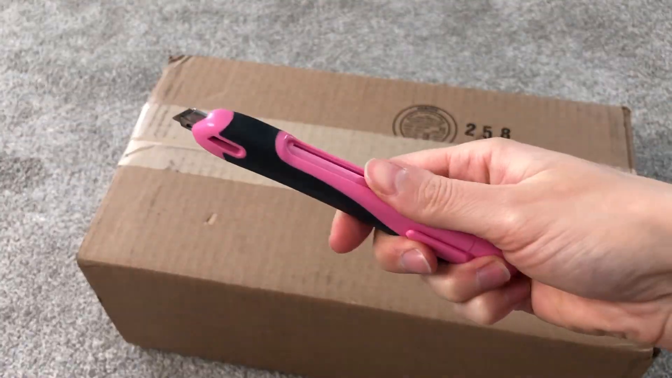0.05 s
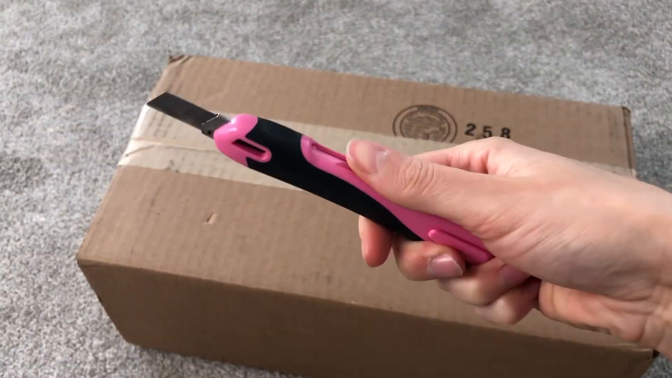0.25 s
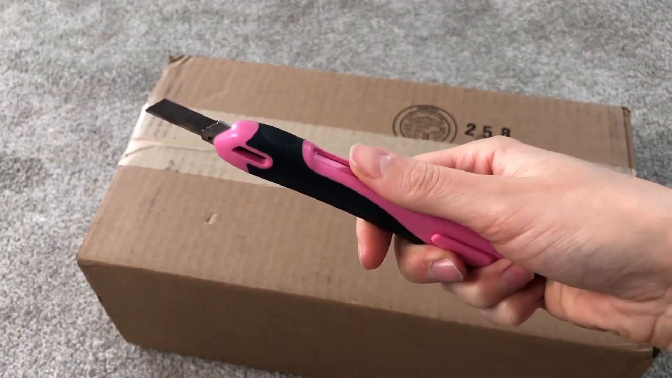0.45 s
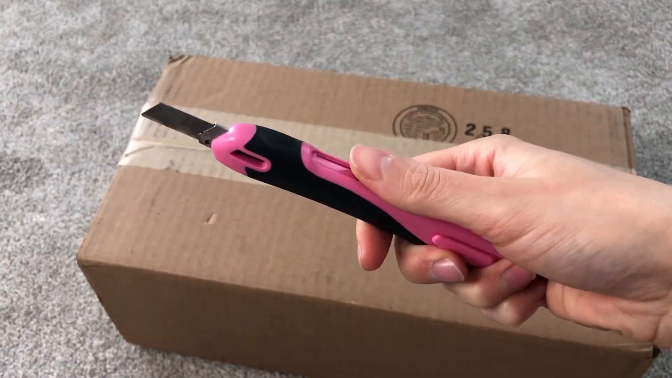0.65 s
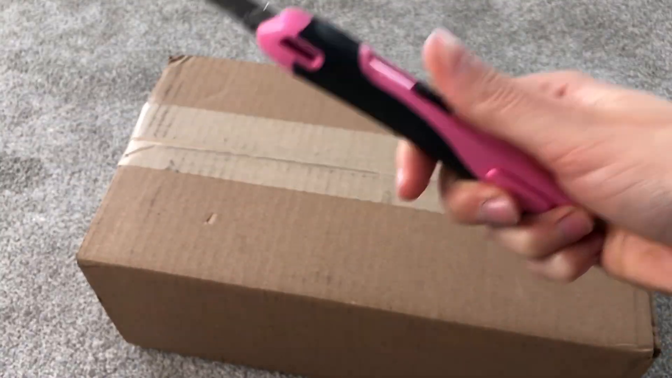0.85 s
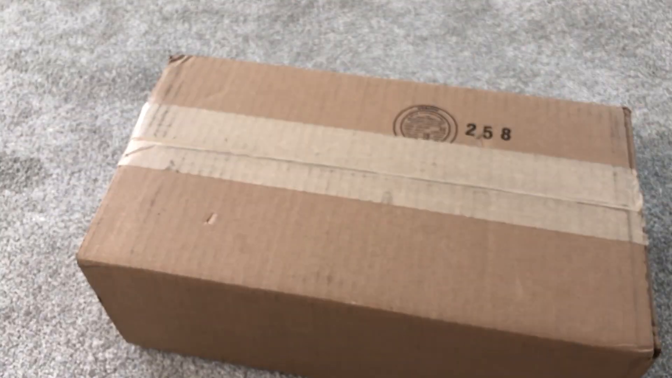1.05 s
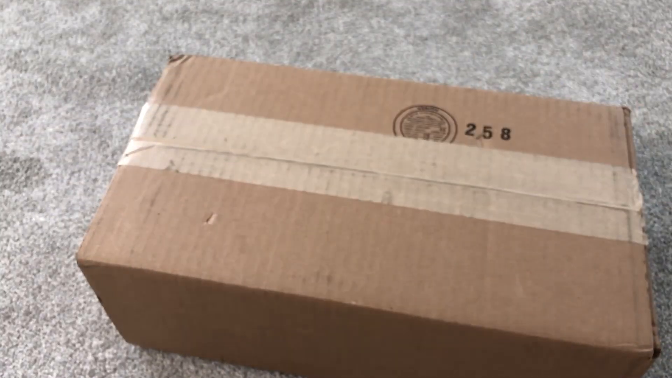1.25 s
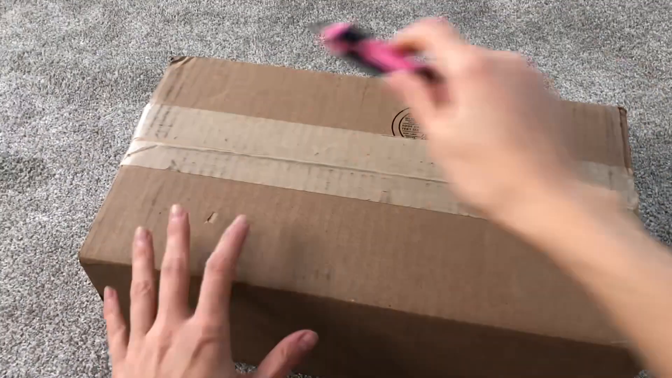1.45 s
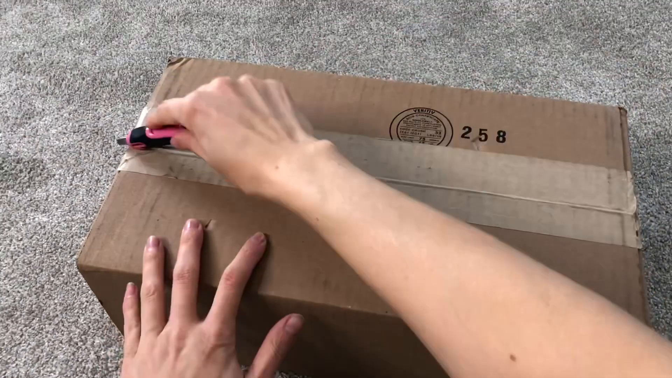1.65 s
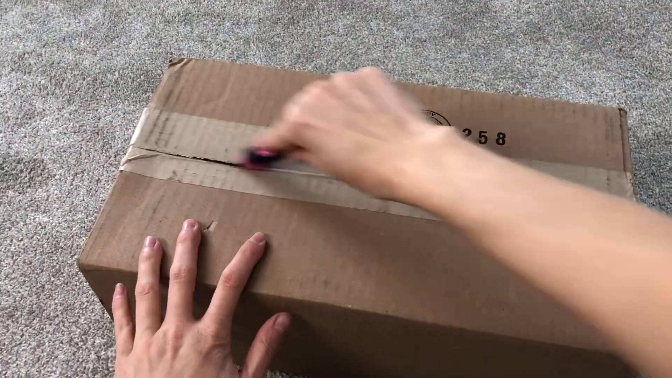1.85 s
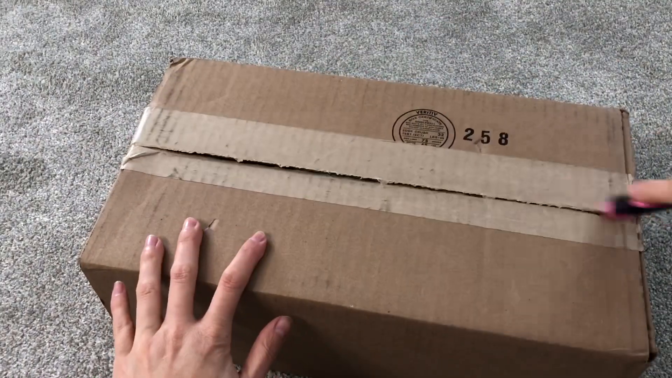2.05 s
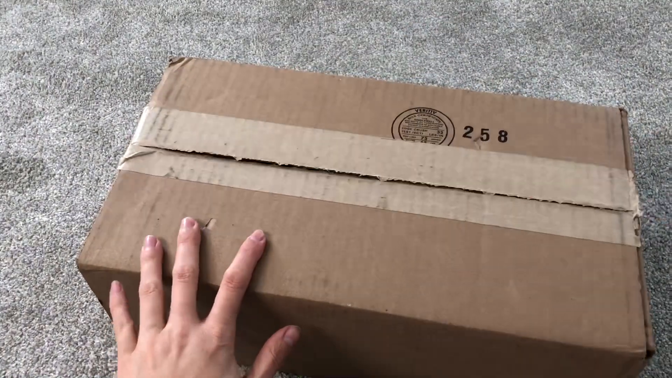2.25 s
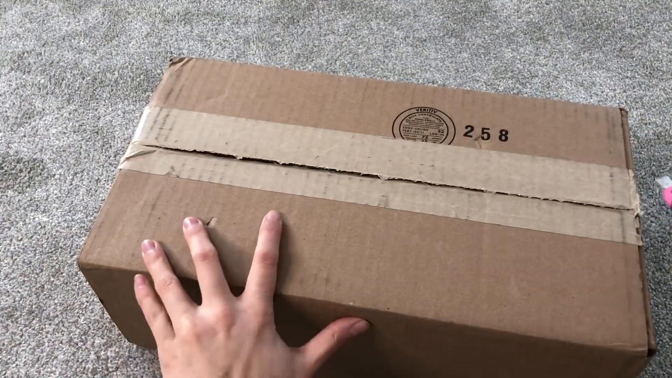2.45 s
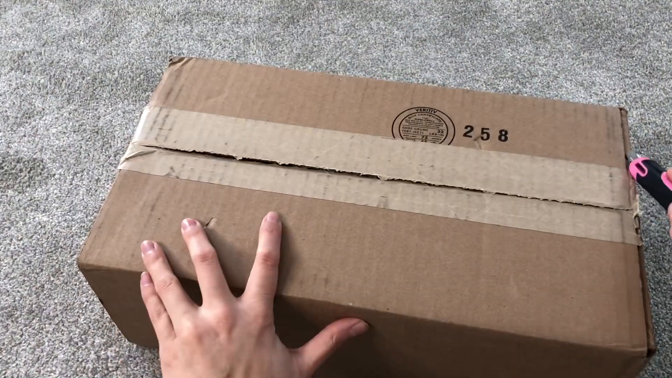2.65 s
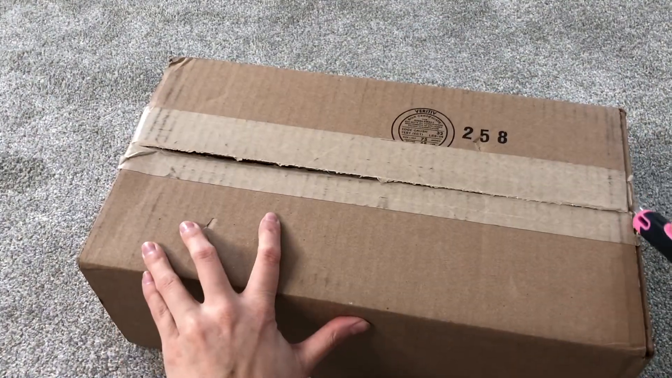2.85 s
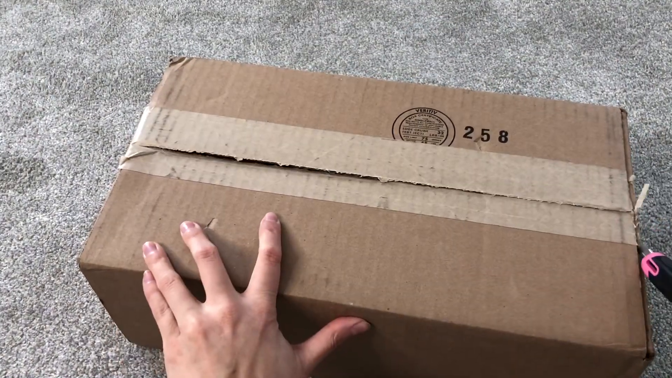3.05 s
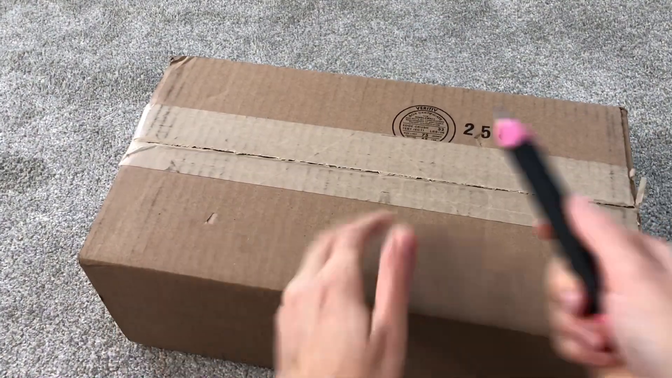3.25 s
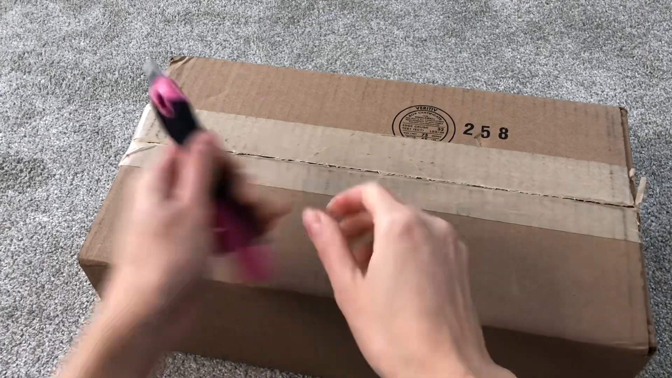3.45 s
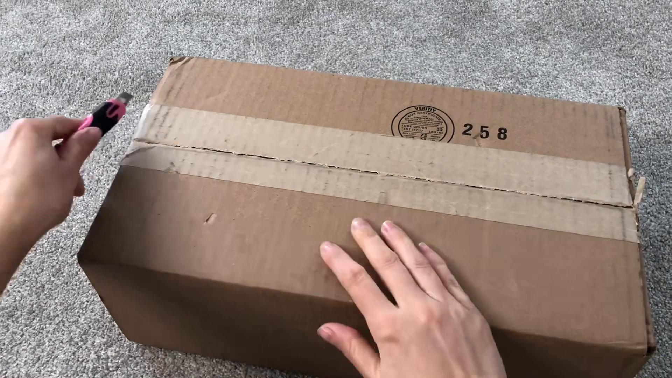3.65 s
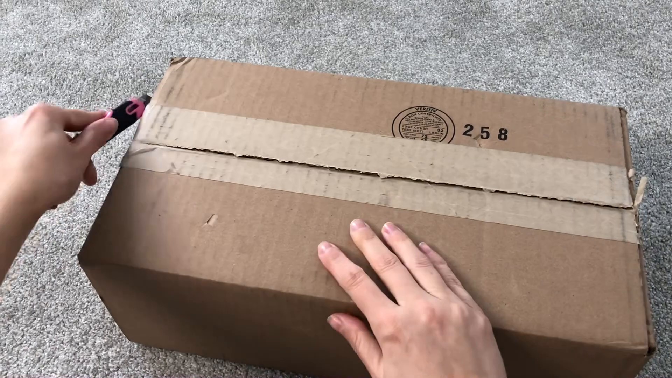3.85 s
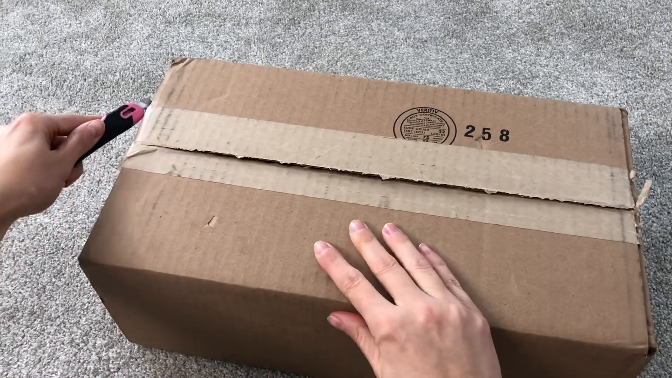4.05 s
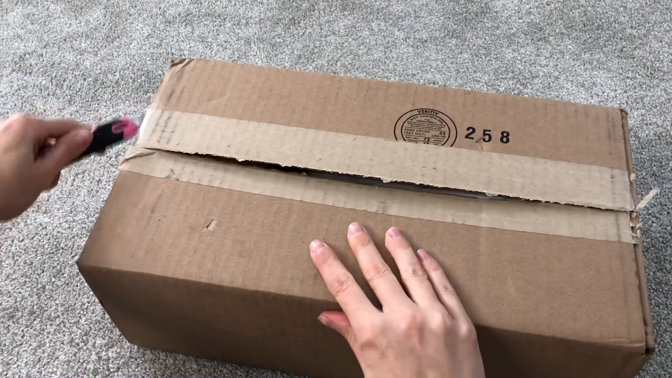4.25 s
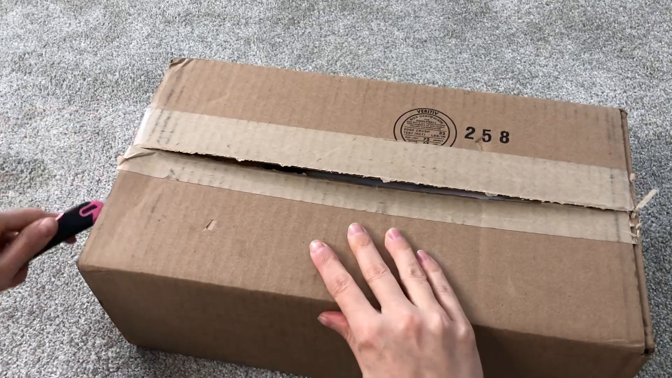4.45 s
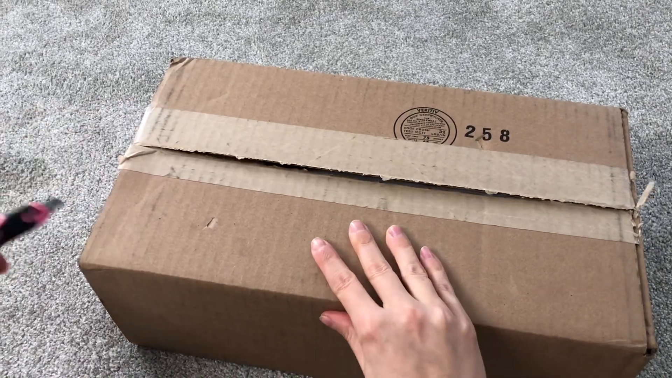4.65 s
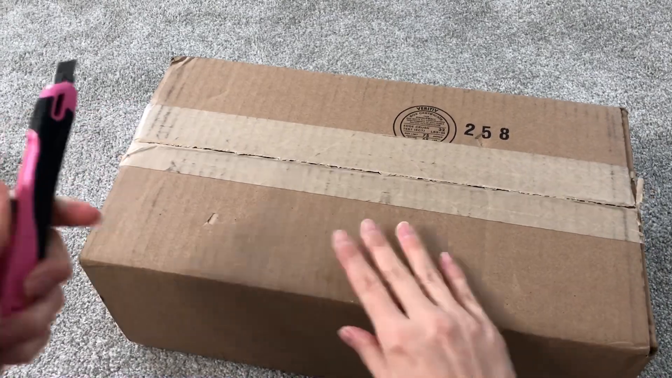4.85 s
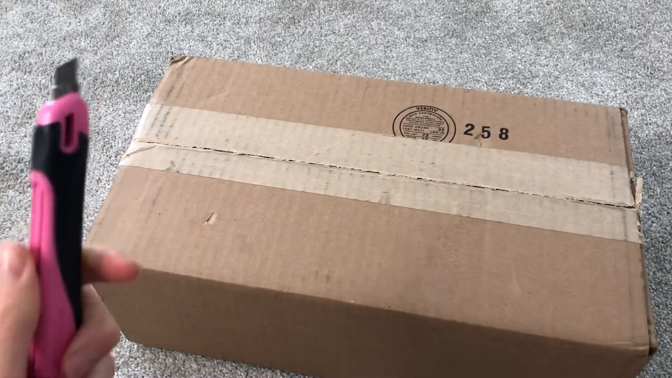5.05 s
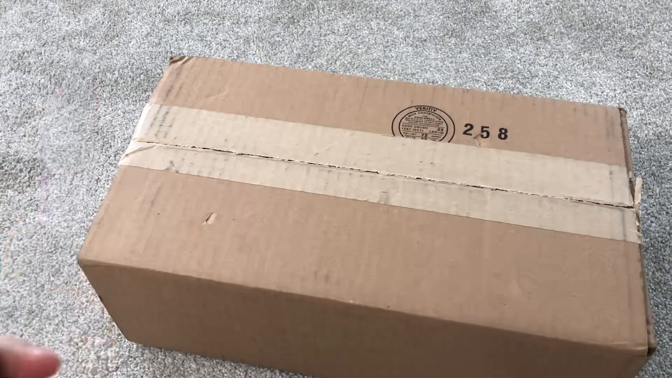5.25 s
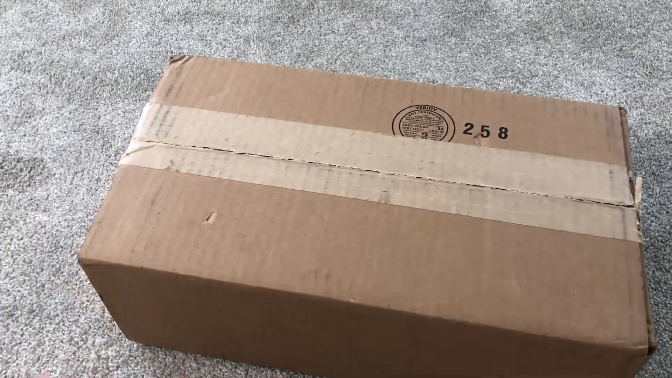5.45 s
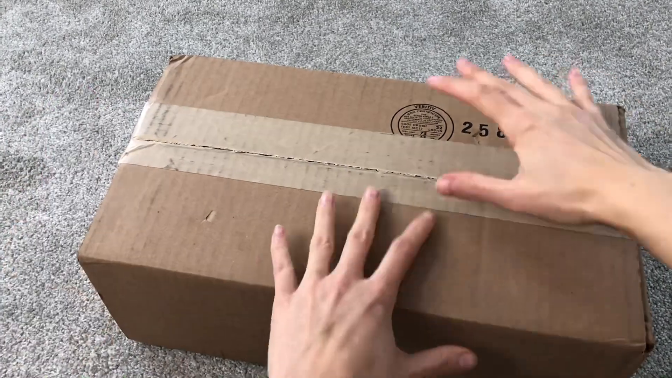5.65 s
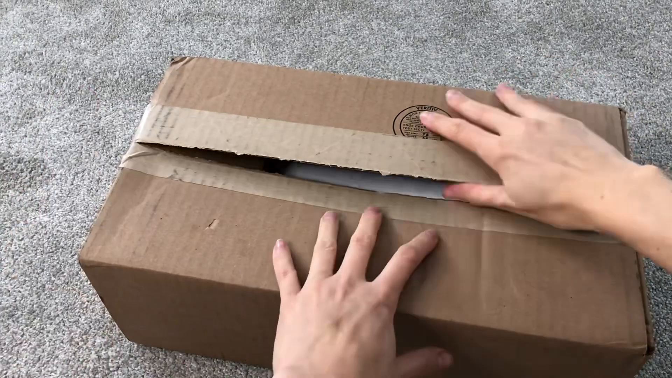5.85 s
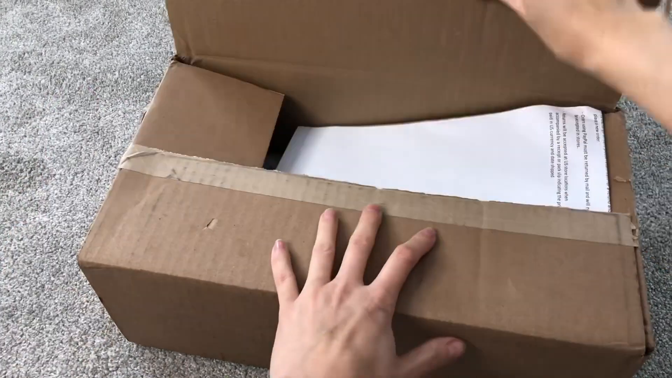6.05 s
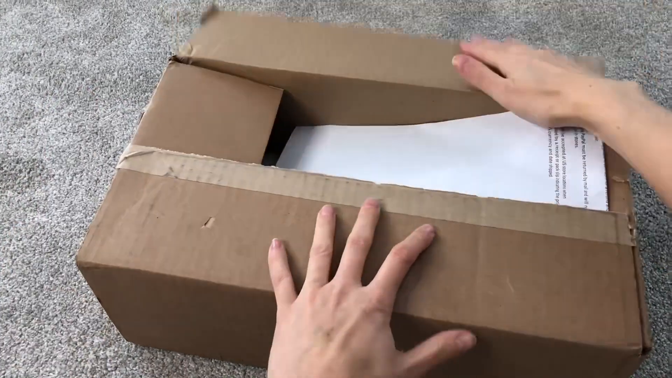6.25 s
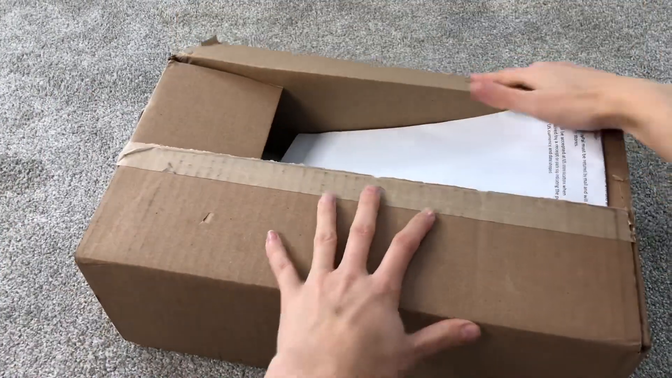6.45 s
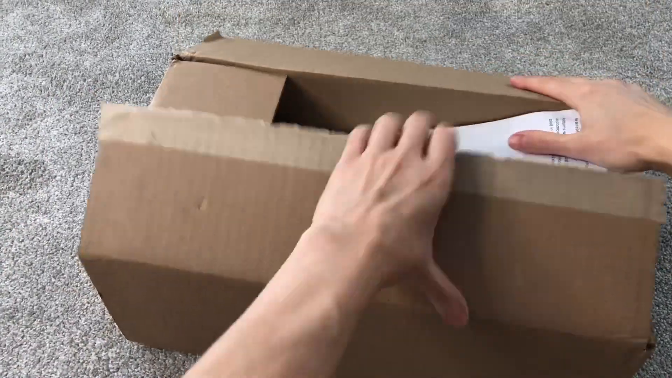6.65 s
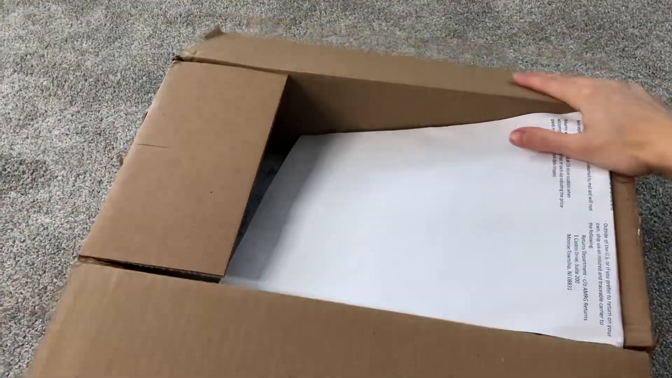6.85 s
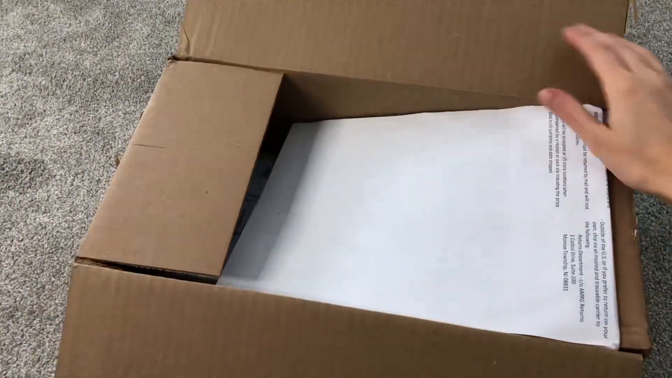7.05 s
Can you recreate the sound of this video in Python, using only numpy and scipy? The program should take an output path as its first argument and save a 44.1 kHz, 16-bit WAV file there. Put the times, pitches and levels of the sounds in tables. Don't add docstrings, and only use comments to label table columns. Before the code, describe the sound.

A plastic knife blade ratchets out, slits box tape in one loud scratchy rip and two softer strokes, clicks shut, then cardboard flaps pop open.

```python
import sys
import numpy as np
from scipy import signal
from scipy.fft import rfft, irfft
from scipy.io import wavfile
from scipy.ndimage import uniform_filter1d

SR = 44100
rng = np.random.default_rng(int(sys.argv[2]) if len(sys.argv) > 2 else 0)


def volts_from_db(level):
    exponent = np.asarray(level, float) / 20
    return 10 ** exponent


def unload_audio(sound):
    columns = np.transpose(np.atleast_2d(sound))
    steps = np.round(np.clip(columns, -1, 1) * 32767)
    wavfile.write(sys.argv[1], SR, steps.astype(np.int16))


N = 313551


def ring(x, modes):
    out = 0
    for k, (hz, width, db) in enumerate(modes):
        b, a = signal.iirpeak(hz, hz / (1.397 * width), fs=SR)
        once = signal.lfilter(b, a, x)
        out = out + (-1) ** k * volts_from_db(db) * signal.lfilter(b, a, once)
    return out


def shifted(modes, chance, spread, scatter_db):
    return [(hz * (1 + spread * chance[k]), width, db + scatter_db * chance[-1 - k])
            for k, (hz, width, db) in enumerate(modes)]


def add(track, s, sound, peak_db):
    i = int(s * SR)
    n = min(len(sound), N - i)
    track[i:i + n] += sound[:n] * volts_from_db(peak_db) / np.abs(sound).max()


def burst(chance, rise_s, fall_s, delay_s=0.):
    t = np.maximum(np.arange(len(chance)) / SR - delay_s, 0)
    return chance * (1 - np.exp(-t / rise_s)) * np.exp(-t / fall_s)


def flicker(rate, depth_db):
    k = int(SR / rate)
    steps = np.repeat(rng.standard_normal(N // k + 1), k)
    return volts_from_db(depth_db * uniform_filter1d(steps, k)[:N])


def grain_levels(size):
    return np.repeat(rng.exponential(size=N // size + 1), size)[:N]


def active(curve):
    t = np.arange(N) / SR
    s, db = np.transpose(curve)
    now = (t > s[0]) & (t < s[-1])
    return now, volts_from_db(np.interp(t[now], s, db))


def dull(x):
    return signal.sosfilt(signal.ellip(8, .2, 60, 15900, fs=SR, output="sos"), x)


# (frequency [Hz], level per Hz [dB])
ROOM_SPECTRUM = [(40, -41), (98, -15), (136, 2), (193, -5.5), (1210, -9), (2400, -16), (5150, -17),
                 (16000, -23.5)]


def room_hush():
    hz, db = np.transpose(ROOM_SPECTRUM)
    f = np.fft.rfftfreq(N, 1 / SR) + 1
    spectrum = rfft(rng.standard_normal(N)) * volts_from_db(np.interp(np.log(f), np.log(hz), db))
    hush = irfft(spectrum, N)
    return volts_from_db(-69) * flicker(1.0, 0.28) * hush / hush.std()


# (time [s], peak level [dB], top level over peak [dB], blade pitch factor [1])
NOTCHES = [
    (0.065, -28, -11, 0.96),
    (0.1172, -32, -5, 0.96),
    (0.156, -32.5, -2.5, 1.08),
    (0.1909, -31, -5, 0.99),
    (5.2492, -28.5, -2.5, 0.93),
    (5.303, -28, -2, 0.91),
    (5.3493, -23.5, -6, 0.96),
    (5.3924, -21, -7, 1),
    (5.4261, -22, -6.5, 1.07),
    (5.4594, -23.5, -6, 1.064),
]
# (frequency [Hz], width [Hz], level [dB])
BLADE_OUT = [(3600, 400, -21), (4500, 450, 4), (5260, 370, -3), (6070, 620, -9)]
BLADE_IN = [(3500, 610, -9), (4330, 440, -10.5), (5120, 450, 1.5), (6000, 730, -11.5)]
# (frequency [Hz], width [Hz], level [dB])
TOP_OUT = [(7200, 210, 8), (7900, 300, -4), (9000, 500, 5), (10660, 630, 2), (12050, 440, -4),
           (13720, 700, 1), (15650, 700, -6.5)]
TOP_IN = [(6880, 250, -5.5), (7500, 390, 1.5), (8400, 350, -4.5), (9220, 240, -7), (10340, 900, -14),
          (12170, 1500, -11.5), (14650, 1400, -15.5)]
# (frequency [Hz], width [Hz], level [dB])
BODY_OUT = [(1510, 370, 2), (1980, 300, 1), (2700, 240, -8)]
BODY_IN = [(1200, 270, -8), (2070, 250, 4), (2790, 260, -2)]
# (frequency [Hz], width [Hz], level [dB])
RATTLE_OUT = [(1800, 750, -12), (3930, 400, -25), (4750, 730, 1.5), (6300, 1000, -26), (12000, 5500, -14.5)]
RATTLE_IN = [(2100, 730, -14.5), (3950, 420, -7.5), (4980, 240, 1.5), (5800, 630, -11), (6900, 600, -11),
             (11600, 6500, -19.5)]
# (time [s], level [dB])
DRAG_OUT = [(0.04, -75), (0.045, -62), (0.052, -72), (0.062, -69), (0.2, -62), (0.24, -75)]
DRAG_IN = [(5.235, -76), (5.25, -64.5), (5.38, -59.5), (5.44, -52.5), (5.484, -66)]
# (time [s], fade out [s], fade in [s])
SCENE_CHANGES = [
    (1.356, 0.024, 0.031),
    (5.485, 0.017, 0.042),
]


def slider():
    out = np.zeros(N)
    handle_db, rattle_db = -37.5, -41
    for (s, db, top_db, factor), chance in zip(NOTCHES, rng.standard_normal((len(NOTCHES), 3, 3500))):
        if s < N / SR / 2:
            blade, top, body, loose = BLADE_OUT, TOP_OUT, BODY_OUT, RATTLE_OUT
        else:
            blade, top, body, loose = BLADE_IN, TOP_IN, BODY_IN, RATTLE_IN
        tick = burst(1 + 0.36 * chance[0], 0.00005, 0.0001, delay_s=0.0037)
        tick = tick + volts_from_db(-30.5) * burst(chance[0], 0.0056, 0.0061)
        tick = np.diff(tick, prepend=0)
        rattle = burst(chance[1], 0.0018, 0.019, delay_s=0.0015)
        rattle = rattle + volts_from_db(5) * burst(chance[2], 0.0006, 0.0039, delay_s=0.0148)
        pitched = [(hz * factor, width, g) for hz, width, g in blade]
        start = s - .004
        add(out, start, ring(tick, shifted(pitched, chance[1], 0.0066, 1.8)), db)
        add(out, start, ring(tick, shifted(body, chance[2], 0.02, 2.0)), handle_db)
        add(out, start, ring(tick, shifted(top, chance[0], 0.008, 2.8)), db + top_db)
        add(out, start, ring(dull(rattle), shifted(loose, chance[2], 0.011, 0.64)), rattle_db)
    for drag, loose in ((DRAG_OUT, RATTLE_OUT), (DRAG_IN, RATTLE_IN)):
        now, gain = active(drag)
        hiss = ring(dull(rng.standard_normal(N)[now]), loose)
        out[now] += gain * hiss / hiss.std() * flicker(300, 3.0)[now]
    out[int(SCENE_CHANGES[-1][0] * SR):] = 0
    return out


def drift(x):
    lag = np.cumsum(np.log(flicker(12, 8.7)) * 0.045)
    lag = lag - uniform_filter1d(lag, size=8000)
    return np.interp(np.arange(N) + lag, np.arange(N), x)


# (frequency [Hz], width [Hz], level [dB])
PANEL = [(143, 50, -10), (250, 83, -4), (306, 130, -5.5), (389, 81, 2), (485, 110, -5), (601, 76, 0.5),
         (723, 190, -5.5)]
# (frequency [Hz], width [Hz], level [dB])
WALL = [(920, 210, -9), (1048, 280, -9.5), (1280, 89, -2.5), (1430, 190, -8), (1617, 430, -15),
        (1905, 340, -8), (2320, 740, -16.5), (2676, 350, -17), (3020, 500, -30.5)]
# (frequency [Hz], width [Hz], level [dB])
EDGE = [(3750, 300, -6), (4300, 330, 0), (4800, 400, -4), (5400, 500, -11), (3300, 500, -11)]
# (frequency [Hz], width [Hz], level [dB])
FIZZ = [(6900, 1200, -7), (8800, 1800, -4), (11000, 2200, 0), (13300, 2500, -2), (15300, 1800, -4)]
# (frequency [Hz], width [Hz], level [dB])
SCUFF = [(2960, 600, -5.5), (3780, 510, -2), (4480, 600, 2), (5195, 560, -3), (6160, 830, -11.5)]
# (time [s], pressure level [dB], slip level [dB])
SETTLE = [(1.38, -89, 16.5), (1.548, -69, -2), (1.76, -62, -8.5)]
LONG_STROKE = [(1.76, -49, -24), (1.796, -36, -15.5), (1.865, -34.5, -16), (1.95, -31, -15),
               (2.05, -34, -13), (2.11, -35.5, -16), (2.17, -54.5, -13), (2.215, -43, -15.5),
               (2.3, -89, -20)]
SEARCH = [(2.335, -64.5, -16), (2.372, -59.5, -14), (2.395, -69, -15), (2.41, -59.5, -21),
          (2.478, -57.5, -20), (2.5, -77, -9.5), (2.575, -85, -13), (2.59, -68, -10), (2.66, -60.5, -18),
          (2.675, -75, 1), (2.72, -70, -11)]
RIGHT_STROKE = [(2.733, -50, -13), (2.74, -46.5, -17), (2.815, -41.5, -17), (2.87, -49, -13),
                (2.97, -43, -16), (3.012, -61.5, -9), (3.027, -44.5, -16), (3.05, -39, -20),
                (3.09, -86, 15)]
SLIDE_OFF = [(3.115, -61, -16.5), (3.145, -51.5, -8), (3.21, -54.5, -13.5), (3.25, -73, -9)]
REACH = [(3.45, -75, -8), (3.522, -84, -4), (3.92, -73.5, -3.5), (3.94, -67, -19), (4.1, -58, -8)]
LEFT_STROKE = [(4.1, -58.5, -17), (4.144, -54, -3), (4.26, -54.5, 0), (4.33, -43.5, -7), (4.45, -41.5, -11),
               (4.5, -45, -10.5), (4.56, -61, -13.5)]
WITHDRAW = [(4.572, -64, -18), (4.58, -59, -13), (4.64, -55.5, -7.5), (4.69, -72.5, -9), (4.72, -67, -18),
            (4.735, -60, -14), (4.79, -61, -15), (4.818, -58.5, -11), (4.87, -55.5, -18), (4.9, -86, -12),
            (4.93, -71, -12)]
FAR_FLAP = [(5.69, -70, -4), (5.71, -63, -5), (5.8, -56, -2.5), (5.9, -60, 1), (5.96, -39, -15),
            (6.0, -55.5, -5), (6.06, -66, 2), (6.094, -52, -21), (6.2, -50, -9.5)]
FOLD_BACK = [(6.2, -56.5, -8), (6.25, -49, -15), (6.27, -48.5, -17), (6.33, -45.5, -17), (6.39, -49, -19),
             (6.41, -54.5, -18), (6.47, -56.5, -12), (6.53, -55.5, -12.5), (6.6, -61, -7)]
NEAR_FLAP = [(6.6, -57, -5), (6.625, -49.5, -5), (6.67, -44.5, -15), (6.7, -48, -3), (6.76, -52, -14),
             (6.94, -55, -17), (6.99, -60, -15), (7.03, -53.5, -11.5), (7.11, -55, -16)]
# (gesture, panel over wall [dB], fizz over slip [dB],
# edge ring over slip [dB], upper wall over wall [dB])
GESTURES = [(SETTLE, -7, -7, -9, -3), (LONG_STROKE, -3.6, -6, -1, -4), (SEARCH, -2.5, -1.1, 2, -4.5),
            (RIGHT_STROKE, 0.61, -7.5, -12, -2.2), (SLIDE_OFF, -2, -11, -10, -2),
            (REACH, 3.26, -7, -14, -7.5), (LEFT_STROKE, 3.8, -6.5, -21, -6),
            (WITHDRAW, -0.66, -8.5, -20, -3), (FAR_FLAP, -3, -8.5, -23, -1.5),
            (FOLD_BACK, -3, -8.5, -7, -5.5), (NEAR_FLAP, -5.5, -9, -21, -9)]


def rubbing():
    grains = rng.standard_normal(N) * volts_from_db(2.0 * grain_levels(40))
    grains = grains * flicker(60, 1.4)
    t, gains = np.arange(N) / SR, 0
    for gesture, panel_db, fizz_db, edge_db, upper_db in GESTURES:
        s, pressure_db, slip_db = np.transpose(gesture)
        slip_db = np.interp(t, s, slip_db)
        parts_db = np.array([0 * t, panel_db + 0 * t, slip_db + edge_db,
                             slip_db + fizz_db, slip_db, upper_db + 0 * t])
        gains = gains + volts_from_db(np.interp(t, s, pressure_db, left=-140, right=-140) + parts_db)
    voices = []
    for part in (WALL[:5], PANEL, EDGE, FIZZ, SCUFF, WALL[5:]):
        voice = 0
        for k, mode in enumerate(part):
            voice = voice + (-1) ** k * flicker(14, 3.7) * ring(grains, [mode])
        voices.append(flicker(25, 1.6) * voice)
    voices[3] = voices[3] * volts_from_db(0 * grain_levels(30))
    for moving in (0, 2, 5):
        voices[moving] = drift(voices[moving])
    return sum(gain * voice / voice.std() for gain, voice in zip(gains, voices))


def stick():
    t = np.arange(N) / SR
    times = [row[0] for row in LONG_CUT + RIGHT_CUT + LEFT_CUT + FLAPS]
    s = np.sort(times + [N / SR + 1])
    wait = s[np.searchsorted(s, t)] - t
    return volts_from_db(-2.5 * np.exp(-wait / 0.0074))


def snaps(rows, panel, edge, fall_s, tail_db, tail_s, spot_width, spot_db, panel_lag_s):
    out = np.zeros(N)
    for (s, db, sharp_db, hz, panel_db), chance in zip(rows, rng.standard_normal((len(rows), 2, 3000))):
        fizz_db = sharp_db - 7.5 + chance[1, -1]
        click = burst(np.ones(len(chance[0])), 0.00002, 0.00004, delay_s=0.0004)
        tear = burst(chance[0], 0.00042, fall_s * volts_from_db(0.12 * (db + 24.0)))
        tear = tear + volts_from_db(tail_db) * burst(chance[1], 0.0028, tail_s)
        drum = volts_from_db(-12.5) * burst(chance[0][::-1], 0.0035, 0.0087)
        snap = volts_from_db(16.5) * click + tear
        spot = (hz, spot_width * (hz / 1300) ** 2, spot_db)
        start = s - .0005
        add(out, start, ring(snap, shifted(WALL, chance[0], 0.025, 3.6) + [spot]), db)
        add(out, s + panel_lag_s, ring(snap + drum, shifted(panel, chance[1], 0.037, 1.9)), db + panel_db)
        add(out, start, ring(volts_from_db(11) * click + tear, edge), db + sharp_db)
        add(out, start, ring(volts_from_db(4.5) * click + tear, FIZZ), db + fizz_db)
    return out


# (time [s], wall peak level [dB], sharpness [dB], wall ring frequency [Hz], panel over wall [dB])
LONG_CUT = [(1.552, -39, -25, 1640, -12), (1.556, -36.5, -22, 1180, -0.5), (1.594, -35.5, -20, 2000, -12.5),
            (1.655, -44, -10, 1400, -7), (1.685, -44.5, -10, 1390, -4.5), (1.732, -45.5, -3, 1270, -10.5),
            (1.762, -39.5, -6, 1350, -6), (1.767, -26, -17.5, 1320, -6.5), (1.789, -22.5, -4, 2150, -1.5),
            (1.826, -18.5, -17, 1620, -12), (1.872, -12, -18, 1350, -6.5), (1.891, -7.5, -18, 1280, -13.5),
            (1.908, -6.5, -23.5, 1370, -10.5), (1.92, -8.5, -15, 2040, -6.5), (1.937, -6, -18.5, 1400, -9),
            (1.951, -4.5, -25.5, 1314, -11.5), (1.966, -16, -19, 1300, -7.5), (1.98, -14, -8.5, 1400, -1.5),
            (1.996, -11.5, -19.5, 980, -5), (2.005, -15.5, -14, 970, -3), (2.021, -22, -23.5, 2100, -7),
            (2.035, -13, -12, 2000, -1.5), (2.049, -18.5, -18, 2050, -5), (2.059, -20, -20, 1280, -8),
            (2.078, -15, -19, 920, -5.5), (2.092, -17.5, -14, 1920, -10.5), (2.106, -19.5, -17.5, 2000, -1),
            (2.123, -33.5, -14, 1360, 6), (2.168, -50, -23.5, 1300, -5), (2.195, -29.5, -25, 1350, -5),
            (2.208, -22.5, -28, 1280, -5)]
RIGHT_CUT = [(2.343, -58, -15, 1400, 7), (2.37, -45.5, -14, 1366, -6), (2.401, -33.5, -38, 1390, -7),
             (2.479, -43, -27, 1400, -3.5), (2.525, -63.5, -20, 1400, 6), (2.586, -39.5, -16, 2030, -6),
             (2.633, -49, -21, 1280, 5.5), (2.688, -50.5, -13, 1280, 0), (2.735, -42.5, -5, 1980, -15),
             (2.743, -36, -18, 2000, -6), (2.759, -35, -15, 1990, -9), (2.782, -36, -11, 2050, 0.5),
             (2.798, -30, -15, 2100, -7), (2.845, -26, -7.5, 2120, 3.5), (2.879, -31, -23, 2050, -14),
             (2.896, -40, -24, 2100, -10), (2.936, -30.5, -17, 1880, 0), (2.964, -40, -27, 1350, -1),
             (3.023, -32, -9.5, 1900, 2.5), (3.04, -31, -6, 2100, -10), (3.043, -17.5, -27, 1290, -9.5),
             (3.192, -36.5, -20, 1490, -5)]
LEFT_CUT = [(3.632, -53, -5.5, 1400, -6), (3.836, -50.5, -13, 1370, -21), (3.94, -47.5, -14, 1290, -2),
            (3.951, -48.5, -22, 1270, -8), (3.994, -55, -20, 1010, 13), (4.011, -54, -1, 1300, 2),
            (4.047, -40.5, -13, 1920, -25), (4.112, -43, -15, 1300, -7), (4.148, -39, -14, 1330, -9),
            (4.161, -28.5, -9.5, 1280, -5), (4.212, -43.5, -15, 2000, 4.5), (4.226, -35, -24, 1280, -20),
            (4.273, -33, -7, 1250, 3), (4.2925, -30, -4, 2100, 0.5), (4.2955, -18.5, -18, 1302, -6),
            (4.314, -22, -12, 1290, -5.5), (4.33, -29, -6, 1280, 4), (4.354, -27, -9, 1930, 4.5),
            (4.375, -31, -8, 1870, 6), (4.397, -30, -16, 1320, -2), (4.422, -30, -19, 1930, -6),
            (4.442, -33.5, -25, 1290, 11), (4.459, -26.5, -18, 1830, 2), (4.478, -33.5, -14, 1310, 6),
            (4.511, -33, -30, 1310, 4), (4.574, -51, -15, 2010, -13), (4.6, -32, -27, 1280, -37),
            (4.619, -44, -17, 2000, -21), (4.719, -49.5, -17, 1400, 6), (4.794, -47, -7, 1900, -1),
            (4.73, -45.5, -11, 1480, -16), (4.855, -40.5, -19, 1950, -8.5), (4.907, -41, -19, 1800, -22.5)]
FLAPS = [(5.699, -41, -14, 1280, -7), (5.748, -56, -12, 1990, -14), (5.817, -39.5, -23, 1050, -4),
         (5.871, -38.5, -16, 2100, -3.5), (5.947, -26.5, -6, 2840, 5.5), (5.952, -16.5, -10, 1190, -16),
         (6.097, -23.5, -23, 1280, -19), (6.117, -64, -9, 1200, -7), (6.261, -30.5, -26, 1184, -18),
         (6.299, -36, -22, 1280, -24), (6.318, -46, -18, 1400, -13), (6.358, -40, -19, 1250, -11),
         (6.418, -56, -5, 1200, -12), (6.468, -48, -6, 1900, 0), (6.482, -39, -21, 1220, -5),
         (6.507, -41, -10, 1200, -2), (6.597, -53, -10, 1900, 0), (6.617, -29.5, -0.5, 1280, -32),
         (6.661, -33, -33, 1280, -14), (6.676, -26.5, -12, 2250, 4.5), (6.681, -15.5, -13.5, 1356, -25),
         (6.689, -24.5, -16, 1400, -11), (6.707, -26.5, -19, 1200, -16), (6.734, -37, -6, 2380, -19),
         (6.772, -45, -10, 920, -1), (6.781, -37, -32, 2240, -2), (6.832, -39.5, -12, 1220, -0.5),
         (6.95, -41.5, -7, 1430, -6), (7.003, -45, -19, 2230, -15), (7.009, -41.5, -20, 2300, -19),
         (7.026, -51, -15, 1930, -19), (7.044, -37, -16, 2460, -6.5), (7.084, -38, 1, 2340, -28)]
# (frequency [Hz], width [Hz], level [dB])
LID = [(134, 35, -6), (221, 60, 0), (268, 96, 0)]


def fibres():
    long_seam = snaps(LONG_CUT, LID + PANEL[3:], EDGE, fall_s=0.0014, tail_db=-16.5, tail_s=0.009,
                      spot_width=150, spot_db=6.5, panel_lag_s=0.0012)
    right_seam = snaps(RIGHT_CUT, PANEL, SCUFF, fall_s=0.0013, tail_db=-9.0, tail_s=0.005,
                       spot_width=177, spot_db=2.7, panel_lag_s=0.00016)
    left_seam = snaps(LEFT_CUT, PANEL[2:], SCUFF, fall_s=0.0017, tail_db=-13, tail_s=0.0093,
                      spot_width=180, spot_db=4.2, panel_lag_s=-0.0003)
    flaps = snaps(FLAPS, PANEL, SCUFF, fall_s=0.0019, tail_db=-9.0, tail_s=0.012,
                  spot_width=190, spot_db=3.2, panel_lag_s=0.00022)
    return long_seam + right_seam + left_seam + flaps


# (time [s], peak level [dB], frequency [Hz], decay by 60 dB [s])
THUMPS = [(1.557, -39, 261, 0.053), (1.566, -38.5, 264, 0.021), (3.484, -51.5, 114, 0.024),
          (3.483, -51.5, 300, 0.023), (3.681, -60, 111, 0.033), (4.199, -40.5, 250, 0.019),
          (5.701, -42, 208, 0.022), (5.956, -25.5, 128, 0.034), (6.098, -26.5, 144, 0.067),
          (6.689, -23, 250, 0.026), (6.795, -39, 150, 0.024), (6.782, -31.5, 640, 0.04)]


def thumps():
    out, t = np.zeros(N), np.arange(6000) / SR
    for s, db, hz, t60 in THUMPS:
        envelope = (1 - np.exp(-t / 0.0024)) ** 2 * volts_from_db(-60 * t / t60)
        swing = np.sin(2 * np.pi * hz * t) * envelope
        add(out, s, ring(swing, [(hz, 3.0 * hz, 0)]), db)
    return out


# (time [s], level [dB])
DRONE = [(1.84, -48), (1.865, -33), (1.9, -28), (1.955, -26.5), (1.97, -30.5), (1.99, -44)]
# (frequency [Hz], width [Hz], level [dB])
DRONE_RING = [(1273, 61, 0), (1400, 47, -2)]
# (time [s], level [dB])
SING = [(1.9, -60.5), (1.935, -44.5), (1.96, -47), (1.99, -41), (2.04, -44.5), (2.07, -52.5)]
# (frequency [Hz], width [Hz], level [dB])
SING_RING = [(4190, 140, 0)]


def singing():
    out = np.zeros(N)
    for curve, modes in ((SING, SING_RING), (DRONE, DRONE_RING)):
        now, gain = active(curve)
        voice = ring((rng.standard_normal(N) * flicker(200, 2.6))[now], modes)
        out[now] += gain * voice / voice.std()
    return out


# (time [s], peak level [dB])
POPS = [
    (5.9495, -8),
    (6.6804, -10),
]
# (frequency [Hz], width [Hz], level [dB])
FAR_RING = [(410, 49, -2), (644, 170, -21), (995, 100, -11), (1115, 77, 0), (1281, 48, -1),
            (1620, 150, -10), (2100, 83, -12), (2800, 370, -17.5)]
NEAR_RING = [(455, 106, -12.5), (640, 105, -9.5), (995, 60, -6), (1135, 60, -11), (1279, 63, 2),
             (1408, 70, -3), (1625, 80, -12), (2270, 220, -18.5)]


def pops():
    out = np.zeros(N)
    for (s, db), modes, chance in zip(POPS, (FAR_RING, NEAR_RING), rng.standard_normal((len(POPS), 5000))):
        blow = burst(np.ones(len(chance)), 0.00003, 0.00005, delay_s=0.00103)
        blow = blow + volts_from_db(-23) * burst(chance, 0.0009, 0.0069)
        add(out, s - .001, ring(blow, modes), db)
    return out


# (time [s], frequency [Hz], level [dB])
CREAK = [
    (6.109, 1908, -62),
    (6.156, 2150, -57),
    (6.178, 2504, -39.5),
    (6.2, 2600, -65),
]


def creak():
    s, hz, db = np.transpose(CREAK)
    t = np.arange(N) / SR
    rough = uniform_filter1d(rng.standard_normal(N), size=60) * flicker(130, 3.2)
    carrier = np.sin(2 * np.pi * np.cumsum(np.interp(t, s, hz)) / SR)
    return volts_from_db(np.interp(t, s, db, left=-140, right=-140)) * carrier * rough / rough.std()


def room_tail(box):
    tail = burst(rng.standard_normal(9000), 0.001, 0.024, delay_s=0.0014)
    soft = signal.lfilter([.4], [1, -.6], tail)
    return volts_from_db(-37.5) * signal.fftconvolve(box, soft)[:N]


def scene():
    friction = stick() * (rubbing() + singing())
    box = fibres() + pops() + creak() + thumps() + friction
    return (slider() + dull(box + room_tail(box) + room_hush()))[None]


def band_limit(x):
    return signal.sosfilt(signal.butter(12, 16800, fs=SR, output="sos"), x)


def record(dry):
    t, gain = np.arange(N) / SR, 1
    for s, out_s, in_s in SCENE_CHANGES:
        fade = np.maximum((s - t) / out_s, (t - s) / in_s)
        gain = gain * np.clip(fade, .03, 1)
    heard = signal.sosfilt(signal.butter(3, 75., "high", fs=SR, output="sos"), dry)
    return band_limit(heard * gain)


dry = scene()
out = record(dry)
unload_audio(out)
```